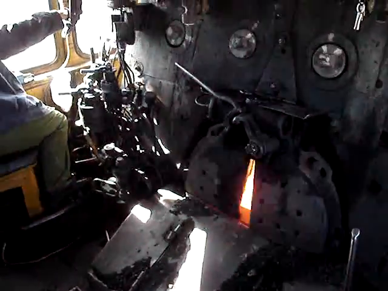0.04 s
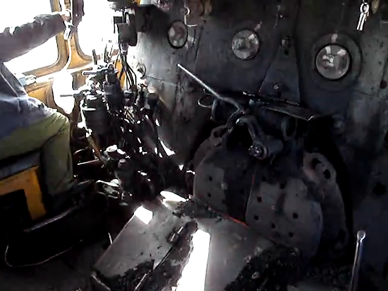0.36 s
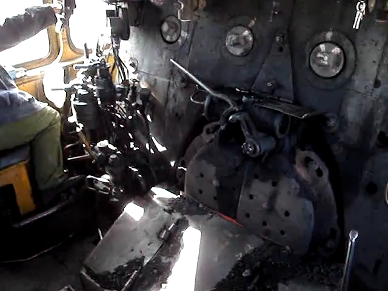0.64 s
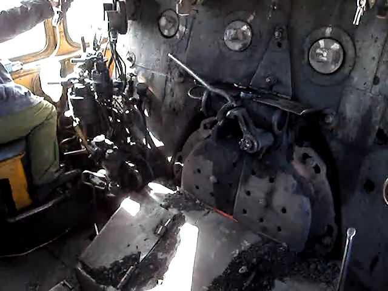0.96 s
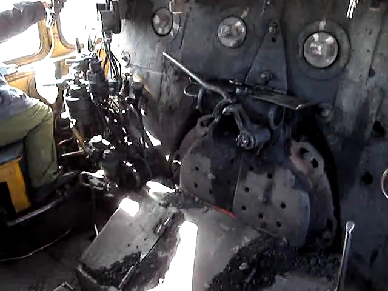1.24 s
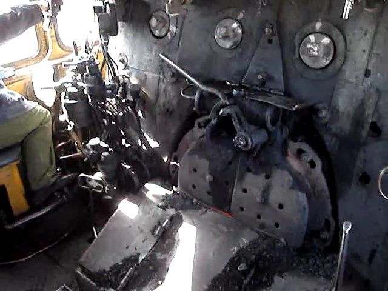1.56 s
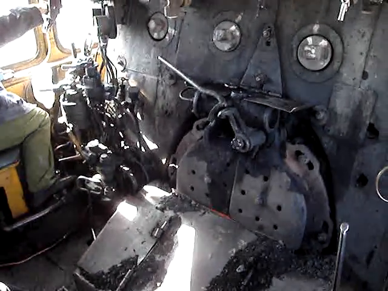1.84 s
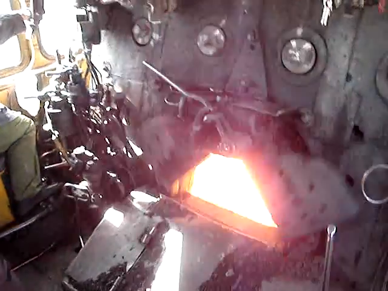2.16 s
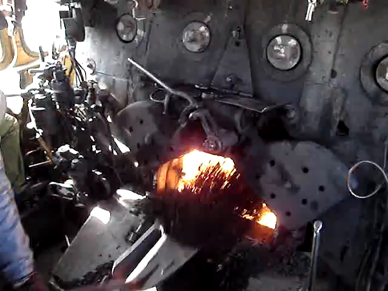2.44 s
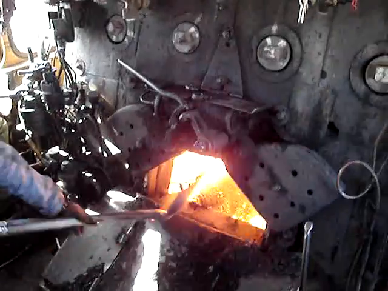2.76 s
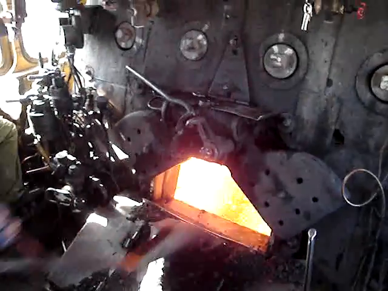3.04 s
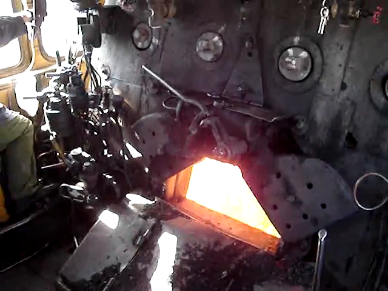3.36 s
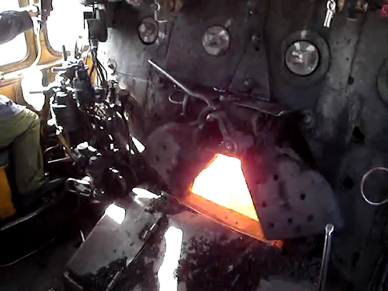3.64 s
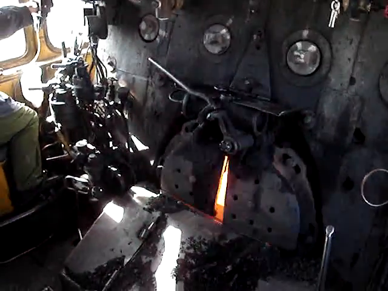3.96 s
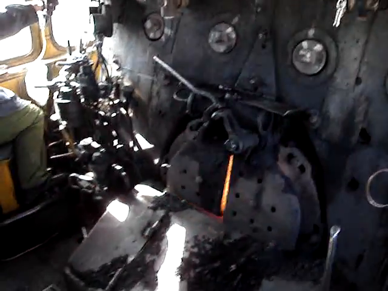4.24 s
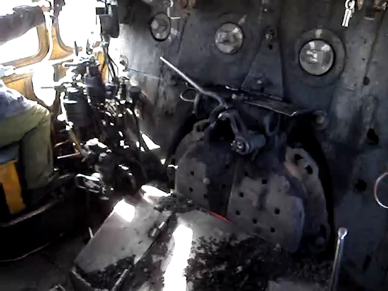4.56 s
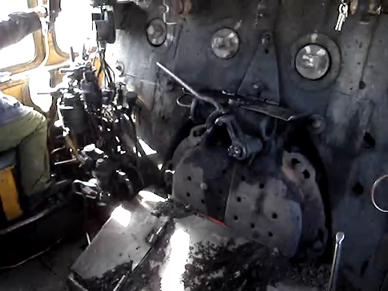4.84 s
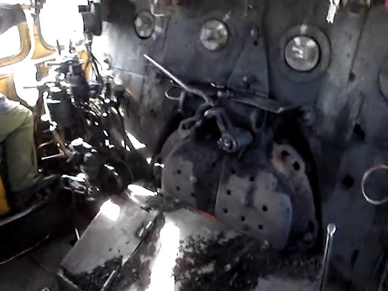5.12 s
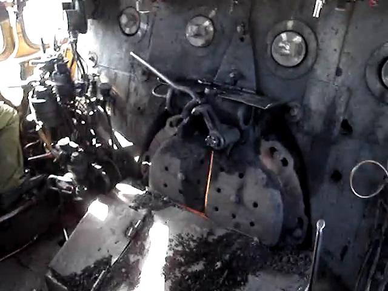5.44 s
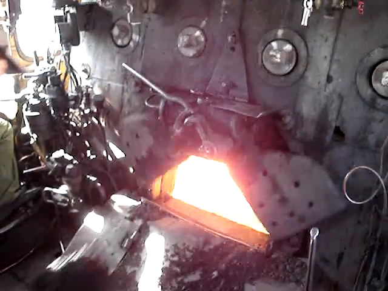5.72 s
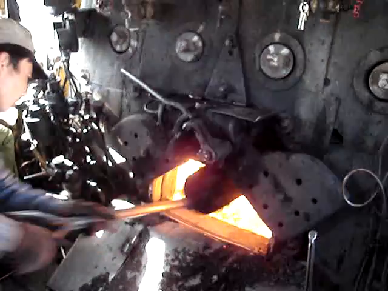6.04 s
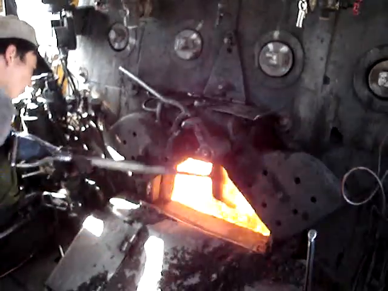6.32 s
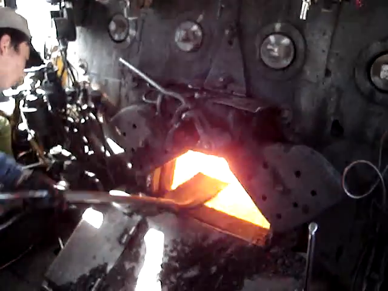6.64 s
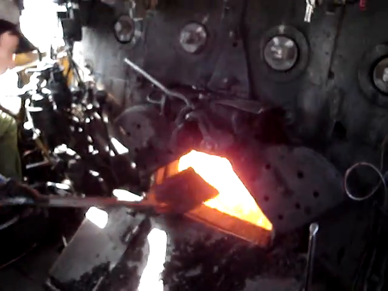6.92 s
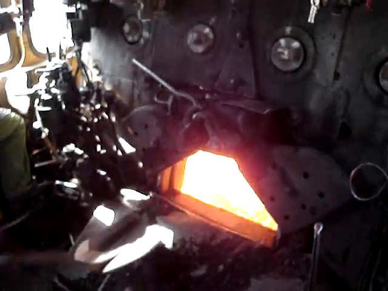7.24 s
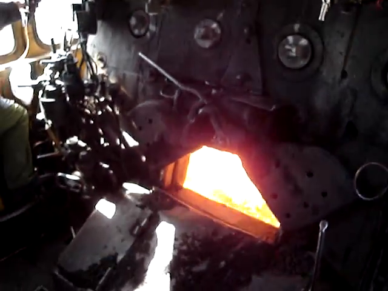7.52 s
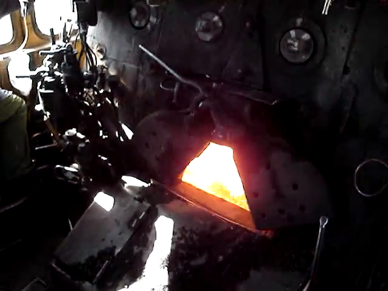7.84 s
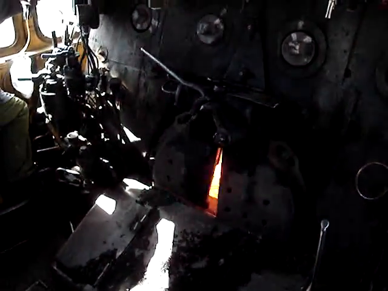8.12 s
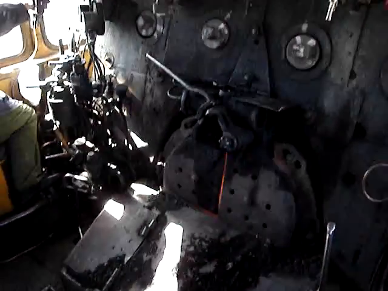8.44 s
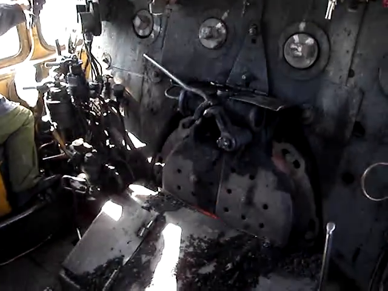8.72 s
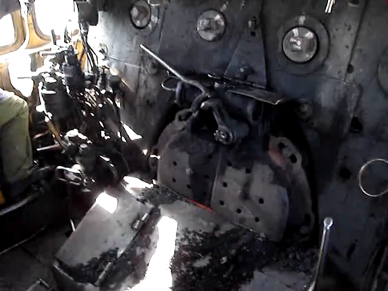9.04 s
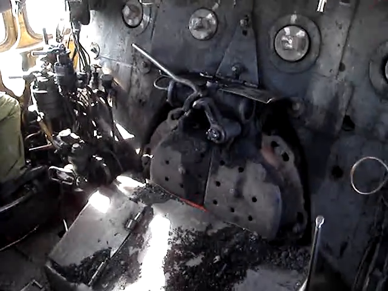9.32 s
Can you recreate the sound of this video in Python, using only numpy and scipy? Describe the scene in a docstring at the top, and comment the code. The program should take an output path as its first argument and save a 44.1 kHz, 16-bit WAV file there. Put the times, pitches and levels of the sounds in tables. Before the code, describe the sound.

Close up in a steel-walled steam locomotive cab, a coal fire roars over a low, gradually quickening throb of running gear. A breathy whistle ends in a sharp air blast and an iron clank as the firebox doors shut at 0.2 seconds. Steam hiss swells, with scattered knocks. At 1.8 seconds air spits and rushes to open the doors; the rumble drops, and a shovel clanks over a steady hissing leak. A whistle at 3.4 leads into another blast and clatter at 3.7. Rumble and steam return, with a tiny squeal and a cluster of sharp knocks around 5 seconds. The doors hiss open again at 5.4, and the shovel clanks repeatedly until about 7.3. They blow shut at 7.8 with a whistle and rattling knocks. The roar and steam build again before a final spit and rush of air at 9.3.

```python
"""Firing a steam locomotive

In the cab the fire roars, the running gear throbs ever faster and steam hisses in the pipework.
Air works the firebox doors: it spits into their cylinder, hisses while they stand open, then whistles
and blows off as they shut. Ironwork knocks and a shovel clanks between close steel walls."""
import sys
import numpy as np
from scipy import signal
from scipy.fft import rfft, irfft, next_fast_len
from scipy.io import wavfile
from scipy.ndimage import uniform_filter1d

SR = 44100
rng = np.random.default_rng(int(sys.argv[2]) if len(sys.argv) > 2 else 0)


def master(y):
    """Save y as 16-bit WAV."""
    cut = np.clip(np.atleast_2d(y).T, -1, 1)
    pcm = np.round(cut * 32767)  # scale
    wavfile.write(sys.argv[1], SR, pcm.astype(np.int16))


N = 418068
TIME = np.arange(N) / SR
TREBLE_HZ = (2550, 9500)


def amp(db):
    """Decibels to gain."""
    return 10 ** (np.asarray(db) / 20)


def unit_rms(x):
    """Scales to an rms of 1."""
    return x / np.sqrt(np.mean(x ** 2) + 1e-20)


def add(mix, s, sound):
    """Mixes a sound in at s seconds."""
    part = mix[max(round(s * SR), 0):][:len(sound)]
    part += sound[:len(part)]


def turbulence(tone, rings, patchy_db, flicker_db, band_hz=TREBLE_HZ):
    """Flow noise with patchy eddies and a shared flicker, coloured by resonances; rms 1 in band_hz."""
    shape = (N // 128 + 5, 257)  # frames, bands
    real, imag, patches = rng.standard_normal((3, *shape))
    patches = uniform_filter1d(patches, size=14, axis=0)
    patches = unit_rms(uniform_filter1d(patches, size=9, axis=1))
    flicker = unit_rms(uniform_filter1d(rng.standard_normal(shape[0]), size=7))
    eddies = (real + 1j * imag) * amp(patchy_db * patches + flicker_db * flicker[:, None])
    noise = signal.istft(eddies.T, nperseg=512, noverlap=384)[1][:N]
    size = next_fast_len(N)
    hz = np.fft.rfftfreq(size, 1 / SR)
    tone_hz, tone_db = np.transpose(tone)
    colour_db = np.interp(np.log(hz + 1), np.log(tone_hz), tone_db)
    lift_db = sum(db / (1 + (2 * (hz - f) / width) ** 2) for f, width, db in rings)
    spectrum = rfft(noise, size) * amp(colour_db + lift_db)
    band_rms = np.sqrt(2) * np.linalg.norm(spectrum[(hz > band_hz[0]) & (hz < band_hz[1])]) / size
    return irfft(spectrum, size)[:N] / band_rms


def flow(spells, rise_s, fall_s, onset_db, settle_s, sag_db_per_s=0):
    """Flow envelope: each spell opens onset_db off its level, settles, sags with pressure and closes."""
    power = np.zeros(N)
    for start, end, db in spells:
        opening = np.clip((TIME - start) / rise_s + .5, 0, 1)
        closing = np.clip((end - TIME) / fall_s + .5, 0, 1)
        age = np.clip(TIME - start, 0, end - start)
        level_db = db + onset_db * np.exp(-age / settle_s) - sag_db_per_s * age
        power += opening * closing * amp(level_db) ** 2
    return np.sqrt(power)


def struck_metal(hits, modes, contact, top_hz):
    """Each hit is a sharp contact and a dying rattle that ring the damped modes of the metal."""
    out, t = np.zeros(N), np.arange(SR // 2) / SR
    hz = np.fft.rfftfreq(len(t), 1 / SR)
    body = sum((-1) ** k * amp(db) / (1 + 2j * (hz - f) / width)
               for k, (f, width, db) in enumerate(modes))
    body = body / (1 + 1j * hz / top_hz) ** 2 * hz / (hz + 260)  # roll off top and bass
    for s, db, t60, tilt_db in hits:
        decay = amp(-60 * t / t60)
        drive = rng.standard_normal(len(t)) * decay
        drive[0] += contact
        brightness = amp(tilt_db * np.log2(hz / 1400 + .1))
        ring = irfft(rfft(drive) * body * brightness, len(t))
        add(out, s, amp(db) * ring * np.linalg.norm(decay) / np.linalg.norm(ring))
    return out


def cab_echo(x, t60, wet_db):
    """Close steel walls give a short, dense echo."""
    t = np.arange(SR // 2) / SR
    echoes_per_s, gap_s = 2000, .004
    taps = rng.choice([-1., 1.], len(t)) * (rng.random(len(t)) < echoes_per_s / SR) * (t > gap_s)
    tail = taps * amp(-60 * t / t60)
    return x + amp(wet_db) * signal.fftconvolve(x, tail / np.linalg.norm(tail))[:N]


def gear_beat():
    """One swell from 0 to 1 per beat of the running gear, quickening as the engine gathers speed."""
    beats_per_s, speedup_per_s2, width_beats = 2.598, .0945, .21
    t = TIME - 1.03  # a beat lands at t = 0
    beats = beats_per_s * t + .5 * speedup_per_s2 * t ** 2
    return np.exp(-((beats - np.round(beats)) / width_beats) ** 2)


def heave(beat_db, column):
    """Envelope of the rumble (column 1) or roar (column 2): a slow bed, the beat and the lurches."""
    # fire and running gear, far lower with the doors open: (time [s], rumble gain [dB], roar gain [dB])
    bed = [(0, -46, -36.5), (.3, -51, -31.5), (.47, -51.5, -42.5), (1.0, -39.5, -33.5), (1.84, -41, -34),
           (1.87, -55, -48), (2.55, -56.5, -39.5), (2.8, -62.5, -54), (3.53, -60.5, -49.5),
           (3.64, -50.5, -36.5), (5.38, -38.5, -35.5), (5.43, -53, -47), (5.82, -57, -41),
           (6.15, -65.5, -52.5), (7.79, -65, -53), (7.83, -52, -37), (9.3, -35.5, -34), (9.35, -56.5, -46)]
    # heavy lurches of the engine: (middle [s], length [s], rumble gain [dB], roar gain [dB])
    lurches = [(0.165, .08, -33, -45), (1.034, 0.048, -37, -47), (1.405, 0.096, -31.5, -32),
               (1.78, 0.089, -36, -31), (2.18, 0.058, -46, -32.5), (4.314, 0.39, -44.5, -35),
               (4.978, 0.035, -29, -45), (5.097, 0.26, -39, -27), (5.347, 0.053, -26, -33),
               (5.73, 0.066, -60, -36), (6.658, 0.041, -53, -42), (8.1, 0.037, -41, -34),
               (9.055, 0.062, -32.5, -29)]
    curve = np.transpose(bed)
    power = amp(np.interp(TIME, curve[0], curve[column]) + beat_db * gear_beat()) ** 2
    for s, length, *db in lurches:
        power += amp(db[column - 1]) ** 2 * np.exp(-(2 * (TIME - s) / length) ** 2)
    return np.sqrt(power)


def fire_and_gear():
    """A throbbing rumble under the lumpy roar of the draught."""
    # colour of the rumble and of the draught: (frequency [Hz], level [dB])
    rumble_tone = [(26, -11), (51, -9.5), (71, -8), (89, -3), (111, 2.5), (151, -6.5), (204, -3.5),
                   (277, 2), (381, 1), (501, -6.5), (801, -8), (2001, -55.5)]
    draught_tone = [(151, -28), (351, -18), (521, -2.5), (701, 1), (901, 1), (1101, 0.5), (1401, 0),
                    (1901, -1.5), (2601, -4), (5001, -15), (9900, -52)]
    # firebox resonances: (frequency [Hz], width [Hz], lift [dB])
    firebox = [(860, 34, 5.5), (950, 65, 5.5), (1160, 90, 1)]
    rumble = turbulence(rumble_tone, [], patchy_db=1.73, flicker_db=1, band_hz=(60, 400))
    roar = turbulence(draught_tone, firebox, patchy_db=2, flicker_db=1.15, band_hz=(570, 1450))
    rumble *= amp(-1.53) * heave(beat_db=6, column=1)
    roar *= amp(-1.5) * heave(beat_db=1, column=2)
    return rumble + roar


def steam_hiss():
    """A steady steam hiss rings in the pipework; its level swells back up after each blow-off."""
    # spells when the hiss is heard: (start [s], end [s], level [dB])
    spells = [(.45, 1.855, -26.5), (3.97, 5.39, -27), (8.1, 9.315, -26)]
    # colour of the steam: (frequency [Hz], level [dB])
    tone = [(610, -18.5), (1510, -15.5), (2310, -10.5), (3310, -9), (4310, -8), (4910, -8.5), (5210, -9.5),
            (6210, -9), (6810, -12), (7610, -9), (8810, -12), (9410, -15), (9990, -23)]
    # pipe resonances: (frequency [Hz], width [Hz], lift [dB])
    rings = [(2180, 45, 6), (2880, 35, 6), (3040, 45, 6.5), (3470, 45, 9.5), (3572, 60, 7.5), (3760, 35, 4),
             (4012, 50, 4.5), (4220, 40, 4.5), (4530, 40, 5), (4598, 50, 8), (4750, 40, 4), (5370, 50, 3.5),
             (7162, 50, 10), (7490, 140, 3), (8120, 80, 3.5), (8780, 50, 8)]
    gain = flow(spells, rise_s=.03, fall_s=.014, onset_db=-13.5, settle_s=.29)
    return gain * turbulence(tone, rings, patchy_db=1.3, flicker_db=.6)


def steam_chirp(at_s=4.995, length_s=.045, level_db=-27, centre_hz=4580, width_hz=260):
    """A short, breathy squeal of steam in the pipework."""
    band = signal.butter(2, [centre_hz - width_hz / 2, centre_hz + width_hz / 2], "bandpass", fs=SR)
    squeal = unit_rms(signal.lfilter(*band, rng.standard_normal(N)))
    return amp(level_db) * squeal * np.exp(-(2 * (TIME - at_s) / length_s) ** 2)


def shovel():
    """The blade clanks in the coal and on the fire hole."""
    # shovel strokes: (time [s], level [dB], rattle t60 [s], brightness [dB/octave])
    scoops = [(2.281, -30, 0.57, 3), (2.5632, -30, 0.23, 2), (3.2785, -32, 0.17, 0),
              (3.5434, -45, .045, 13), (5.5494, -29, 0.044, -9), (5.865, -28, 0.084, -2),
              (6.0837, -39, 0.25, -4), (6.3622, -35.5, 0.15, 1), (6.6519, -38, 0.38, 0),
              (7.201, -36, 0.37, 15)]
    # blade modes: (frequency [Hz], width [Hz], level [dB])
    modes = [(425, 240, -22), (878, 84, 1.5), (1245, 140, -2), (1580, 150, -1), (2150, 340, -5.5)]
    return struck_metal(scoops, modes, contact=3, top_hz=4900)


def ironwork():
    """The doors and loose ironwork knock and rattle."""
    # knocks: (time [s], level [dB], rattle t60 [s], brightness [dB/octave])
    knocks = [(.1085, -37, 0.073, -5), (.227, -17.5, 0.16, 3.5), (.7445, -22.5, 0.08, 0),
              (1.213, -21.5, .045, 8), (1.459, -19, .075, 14), (3.6687, -21, 0.06, 2),
              (3.7135, -15, 0.076, 1.5), (3.7595, -22.5, 0.26, 4), (4.0755, -37, .045, 10),
              (4.1545, -12.5, 0.042, 2), (4.4625, -16, 0.19, 2), (5.0755, -13, 0.038, 2),
              (5.1305, -24, 0.039, -12), (5.1728, -12, 0.052, 2), (5.2215, -14, 0.055, 2.5),
              (5.3835, -23.5, 0.04, -4), (7.8225, -23.5, .17, -3), (7.899, -21.5, 0.2, 2.5),
              (8.0715, -27.5, 0.26, -1), (8.6454, -19, 0.4, 4.5), (9.084, -22, 0.088, 7)]
    # iron modes: (frequency [Hz], width [Hz], level [dB])
    modes = [(629, 134, -0.5), (860, 56, 3.5), (1072, 57, 6.5), (1264, 210, -2), (1774, 250, -1.5),
             (2330, 310, -3), (2720, 620, -6.5)]
    return struck_metal(knocks, modes, contact=3.5, top_hz=4400)


def valve_spits():
    """Short wet puffs as the air valve cracks open."""
    # spits: (time [s], level [dB], length [s], centre [Hz])
    puffs = [(1.831, -33, 0.015, 5600), (1.8475, -18, 0.0099, 3500), (5.363, -20.5, 0.014, 2920),
             (5.373, -23.5, 0.064, 1830), (9.307, -20.5, 0.026, 3140)]
    out, t = np.zeros(N), np.arange(-SR // 10, SR // 10) / SR
    hz = np.fft.rfftfreq(len(t), 1 / SR)
    for s, db, length, centre_hz in puffs:
        colour = amp(-5.4 * np.log2((hz + 1) / centre_hz) ** 2)
        puff = unit_rms(irfft(rfft(rng.standard_normal(len(t))) * colour, len(t)))
        add(out, s + t[0], amp(db) * puff * np.exp(-(2 * t / length) ** 2))
    return out


def air_inlet():
    """Air rushes into the door cylinder."""
    # cylinder filling: (start [s], end [s], level [dB])
    spells = [(1.855, 2.47, -28.5), (5.39, 5.92, -28), (9.315, 9.6, -27.5)]
    # colour of the rush: (frequency [Hz], level [dB])
    tone = [(610, -25.5), (1710, -13), (2310, -6), (3310, -6.5), (4210, -5), (4810, -7), (6210, -7),
            (8010, -9), (9310, -11.5), (9990, -17)]
    # inlet resonances: (frequency [Hz], width [Hz], lift [dB])
    rings = [(2172, 28, 6.5), (2872, 82, 2), (3500, 110, 6.5), (5190, 170, 6.5), (5600, 220, 4)]
    gain = flow(spells, rise_s=.015, fall_s=.086, onset_db=3, settle_s=.077)
    return gain * turbulence(tone, rings, patchy_db=1, flicker_db=.76)


def air_leak():
    """The cylinder leaks under pressure while it holds the doors open."""
    # doors open: (start [s], end [s], level [dB])
    spells = [(2.47, 3.43, -29.5), (5.92, 7.61, -30)]
    # colour of the leak: (frequency [Hz], level [dB])
    tone = [(510, -24.5), (1510, -10), (2210, -1.5), (3210, 1.5), (3910, -1.5), (4410, -3), (5310, -1),
            (6210, -3.5), (7510, -3), (9210, -2.5), (9990, -8.5)]
    # leak resonances: (frequency [Hz], width [Hz], lift [dB])
    rings = [(2815, 130, 10.3), (3085, 110, 7.5), (3380, 70, 2.5), (3605, 160, 8.5), (3970, 120, 2.5),
             (6882, 120, 2.5), (8242, 140, 2.5)]
    gain = flow(spells, rise_s=.056, fall_s=.14, onset_db=.8, settle_s=.73)
    return gain * turbulence(tone, rings, patchy_db=.97, flicker_db=.82)


def air_bleed():
    """Air bleeds from the released valve before and after a blow-off."""
    # valve released: (start [s], end [s], level [dB])
    spells = [(-.3, .185, -25.5), (3.43, 4.2, -31.5), (7.61, 7.83, -35), (8.02, 8.3, -31.5)]
    # colour of the bleed: (frequency [Hz], level [dB])
    tone = [(610, -24), (1510, -3), (2010, -5), (2460, 3.5), (3060, 3), (3610, 5), (4110, 0), (5410, 1),
            (6510, -5), (8510, -6), (9310, -11.5), (9990, -18)]
    gain = flow(spells, rise_s=.11, fall_s=.058, onset_db=-1.5, settle_s=.053)
    return gain * turbulence(tone, [], patchy_db=1.3, flicker_db=1)


def valve_whistle():
    """The jet at the valve flutters in a breathy whistle as the doors begin to shut."""
    # whistles: (start [s], end [s], level [dB])
    spells = [(-.6, .185, -27.5), (3.4, 4.15, -31.5), (7.76, 8.3, -33.5)]
    # colour of the note: (frequency [Hz], level [dB])
    tone = [(1210, -38.5), (1810, -21), (1940, -13), (2000, -16), (2090, -8.5), (2190, -9), (2250, -23),
            (2410, -13), (3210, -53)]
    gain = flow(spells, rise_s=.3, fall_s=.13, onset_db=-3.5, settle_s=.17)
    return gain * turbulence(tone, [], patchy_db=.5, flicker_db=2.4, band_hz=(1960, 2300))


def blow_off():
    """The cylinder dumps its air as the doors swing together, fading as the pressure falls."""
    # blasts: (start [s], end [s], level before the sag [dB])
    spells = [(.185, .45, -18), (3.712, 3.93, -18.5), (7.822, 8.03, -20)]
    # colour of the blast: (frequency [Hz], level [dB])
    tone = [(255, -29), (610, -20), (1110, -11), (1460, -4), (2110, -3.5), (2910, -3), (4410, -3),
            (6010, -6.5), (8310, -8.5), (9990, -17)]
    # vent resonances: (frequency [Hz], width [Hz], lift [dB])
    rings = [(1110, 160, 5), (2230, 110, 1)]
    gain = flow(spells, rise_s=.0032, fall_s=.07, onset_db=-8, settle_s=.1, sag_db_per_s=35.5)
    return gain * turbulence(tone, rings, patchy_db=.5, flicker_db=1.04)


def scene():
    """Hits and flows bounce round the cab, the same in both channels."""
    hits = cab_echo(ironwork() + shovel() + valve_spits(), t60=.24, wet_db=-12)
    engine = fire_and_gear() + steam_hiss()
    door_air = air_inlet() + air_leak() + air_bleed() + valve_whistle() + blow_off()
    flows = cab_echo(engine + door_air + steam_chirp(), t60=.1, wet_db=-17)
    return np.array([hits + flows] * 2)


def record(dry):
    """A steep low-pass takes off the top octave."""
    taps = signal.firwin(801, cutoff=10130, window=("kaiser", 9), fs=SR)
    return signal.oaconvolve(dry, taps[None], "same")


dry = scene()
out = record(dry)
master(out)
```